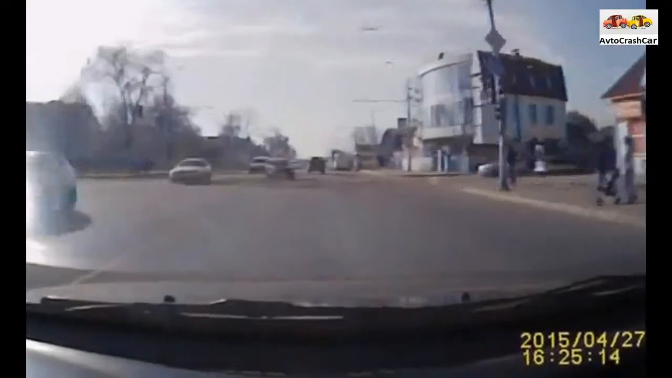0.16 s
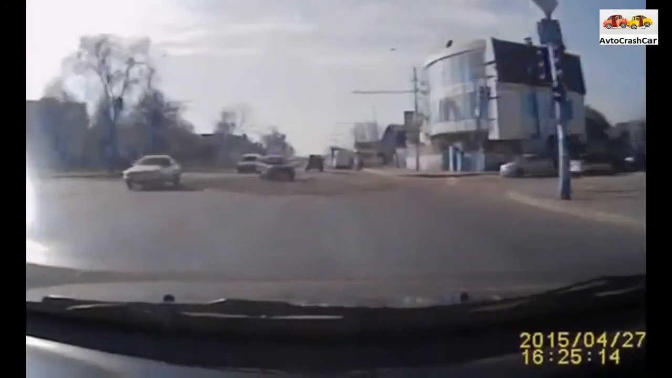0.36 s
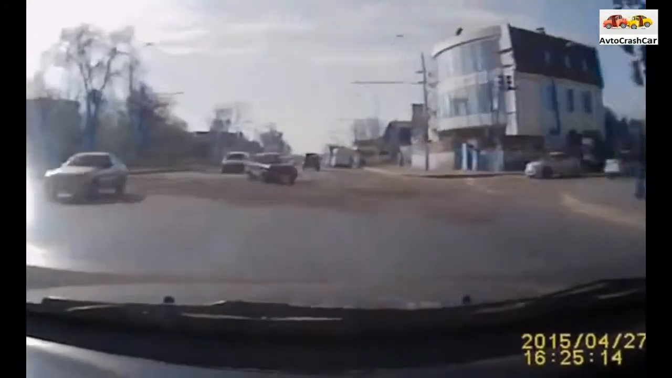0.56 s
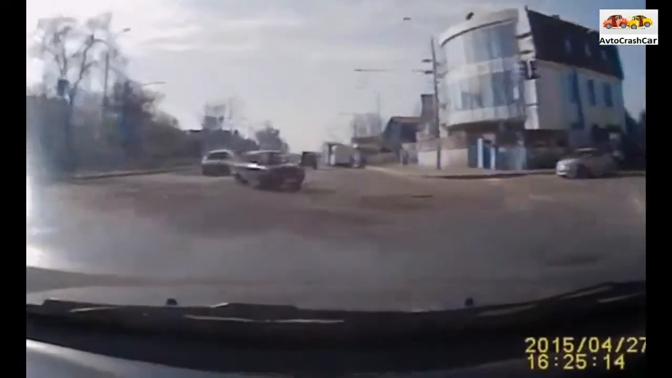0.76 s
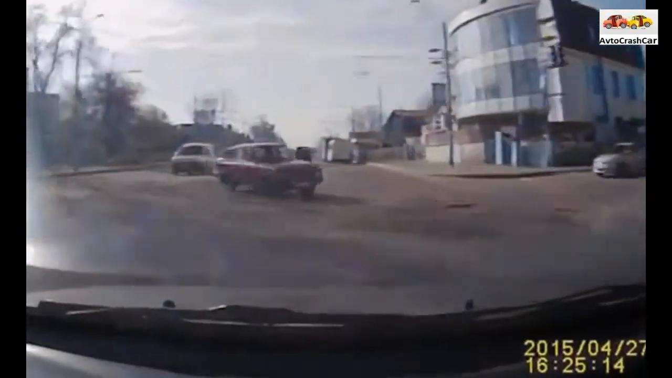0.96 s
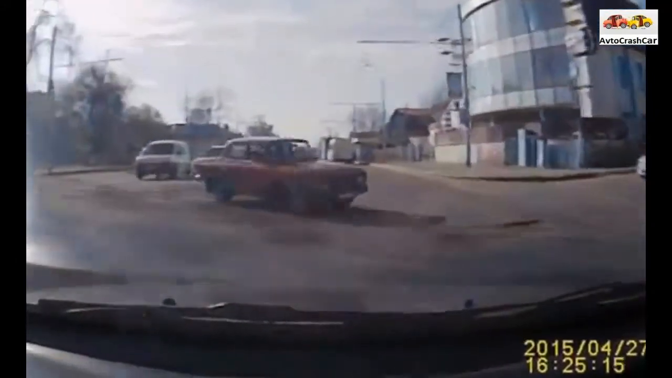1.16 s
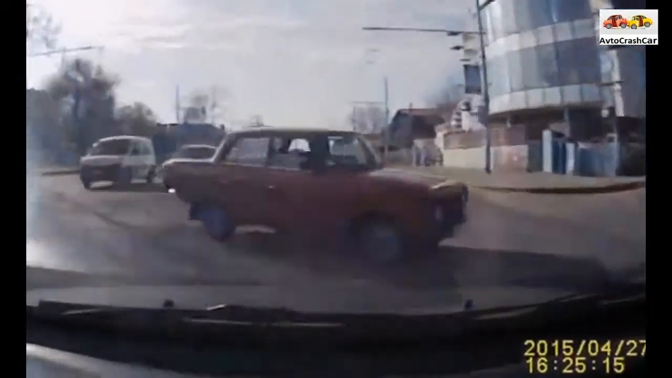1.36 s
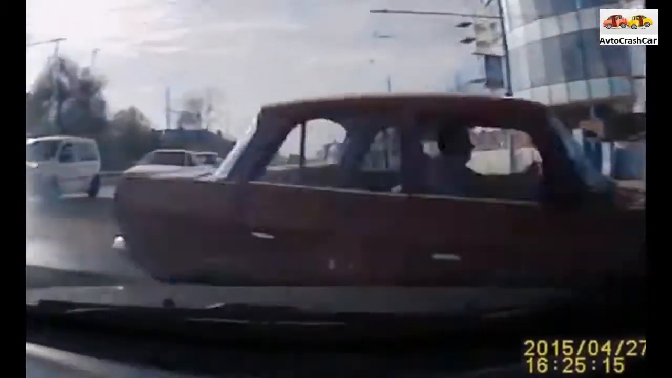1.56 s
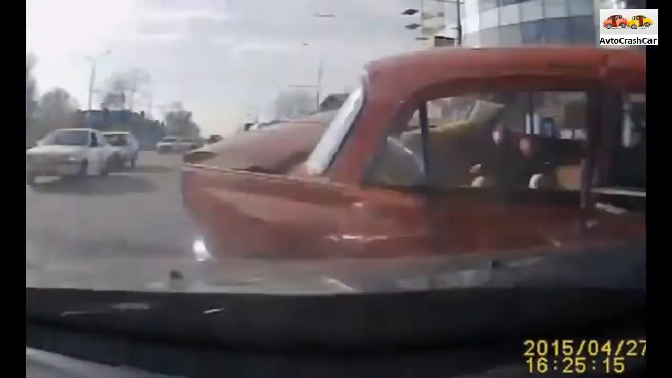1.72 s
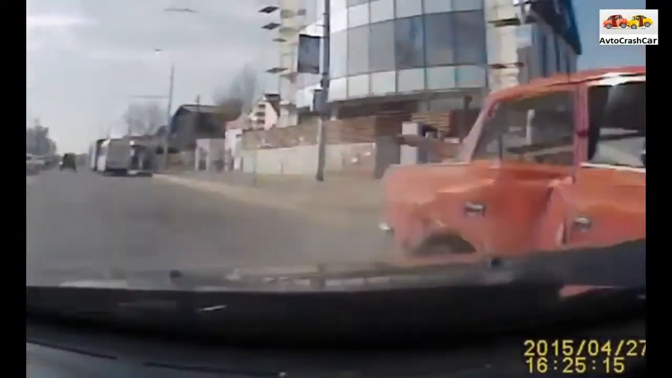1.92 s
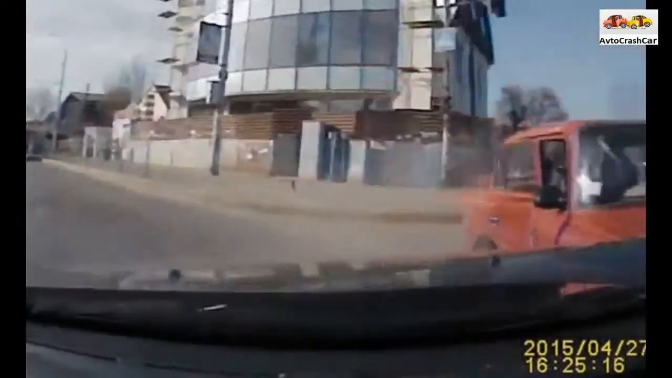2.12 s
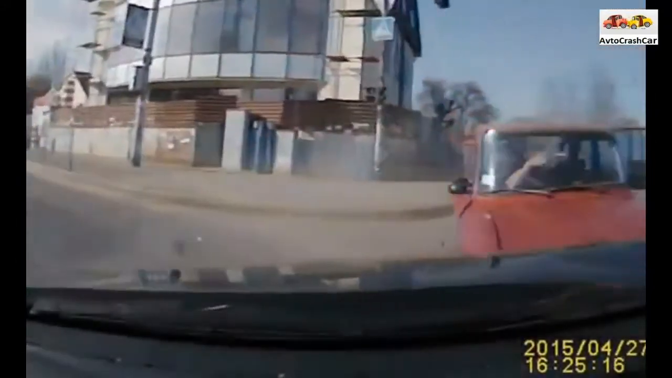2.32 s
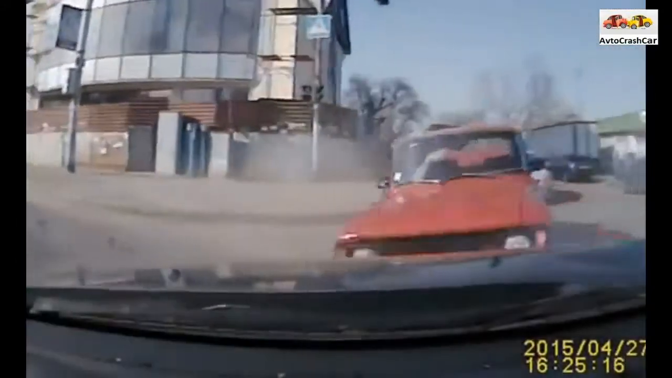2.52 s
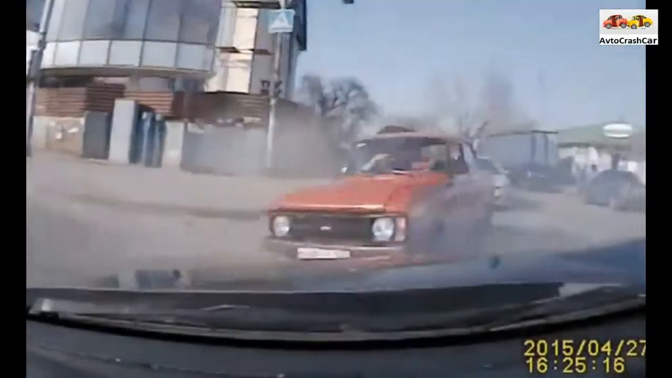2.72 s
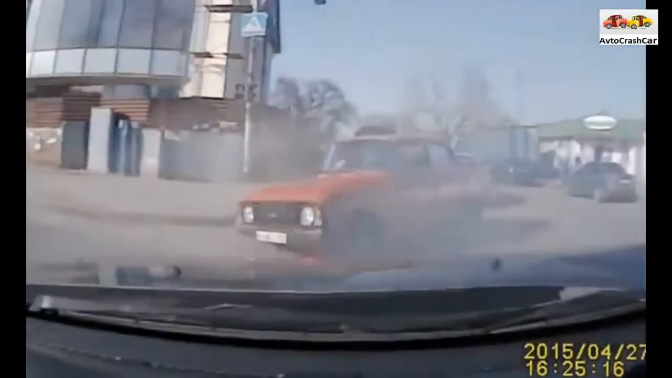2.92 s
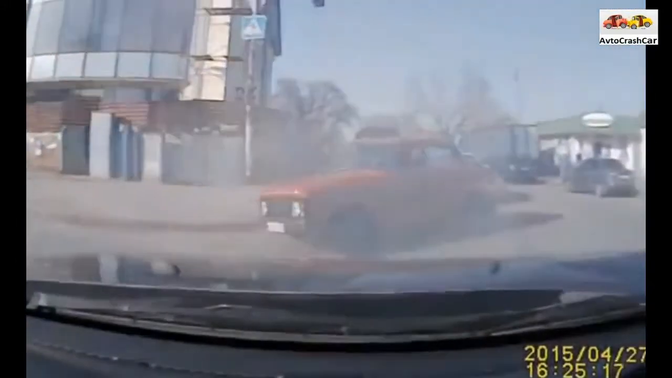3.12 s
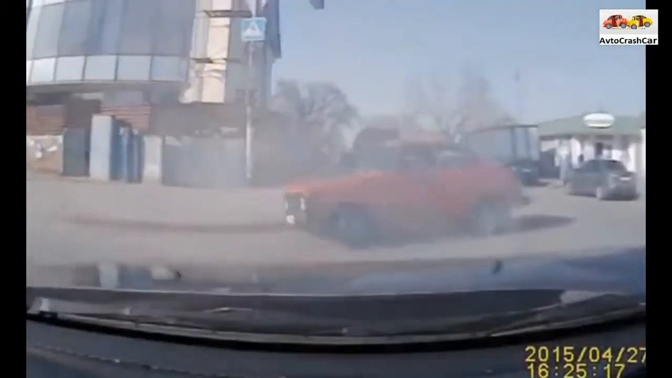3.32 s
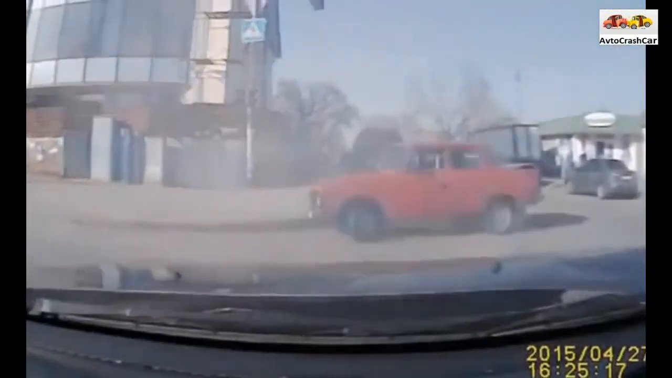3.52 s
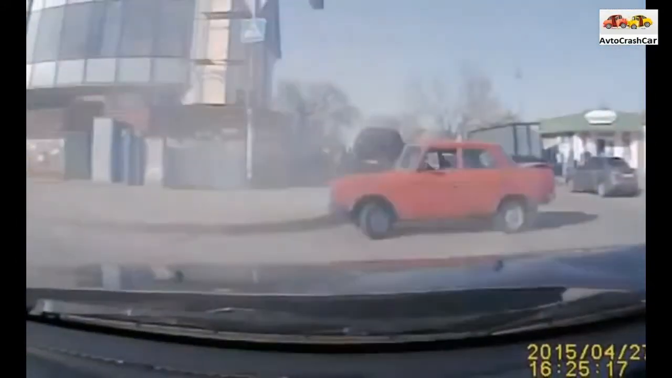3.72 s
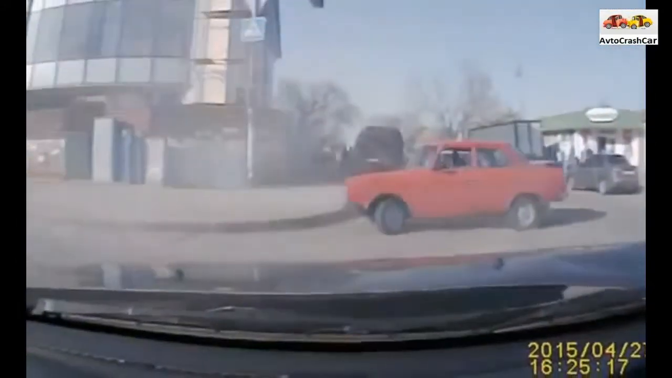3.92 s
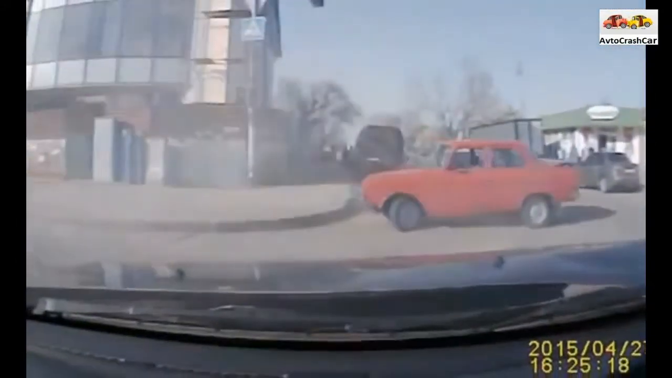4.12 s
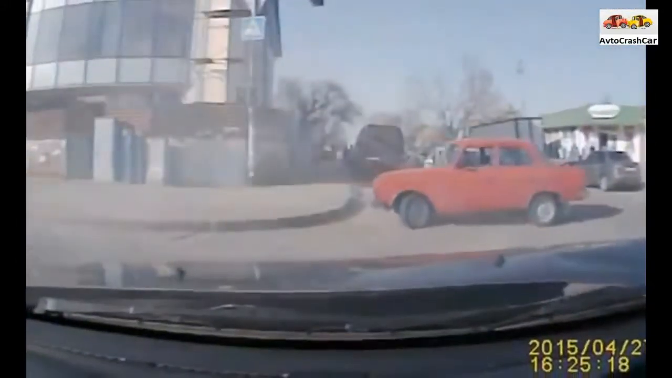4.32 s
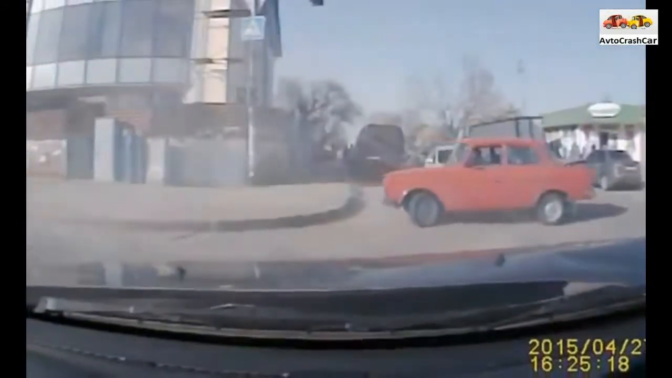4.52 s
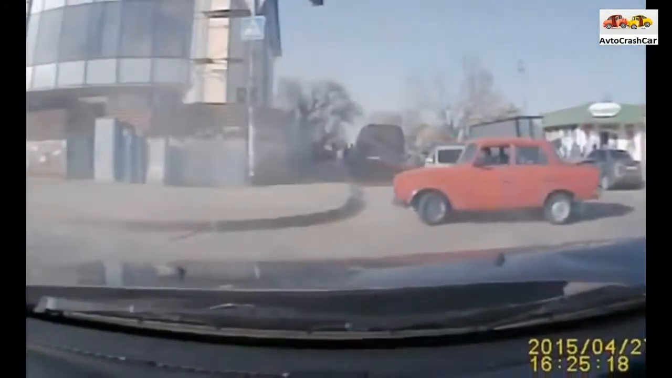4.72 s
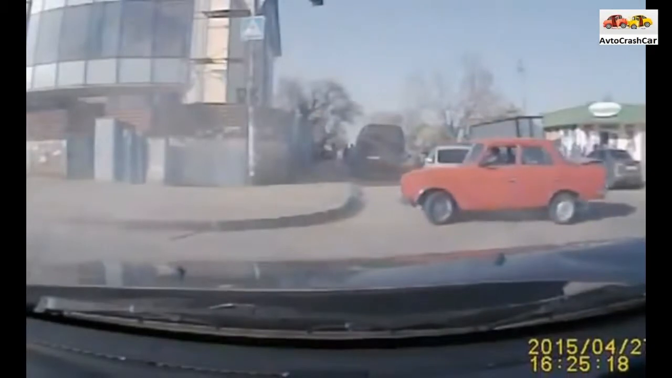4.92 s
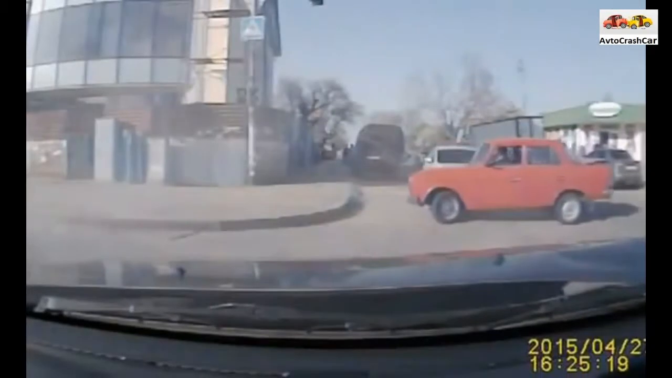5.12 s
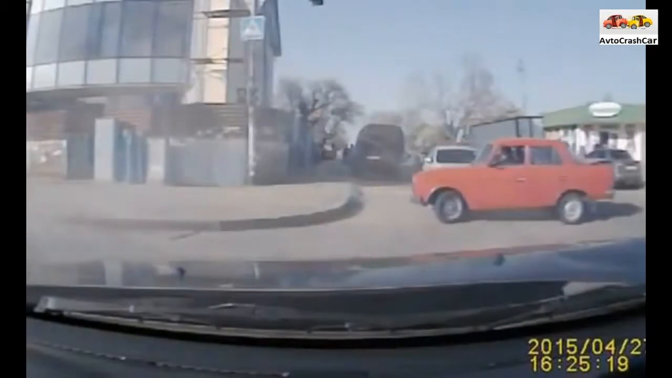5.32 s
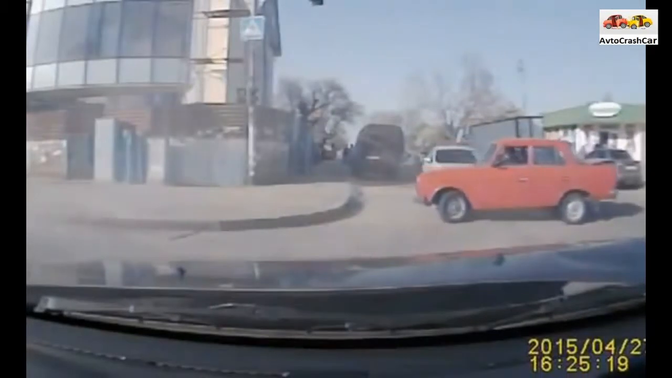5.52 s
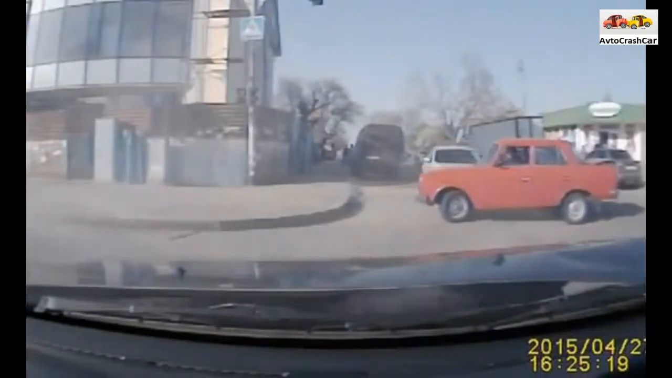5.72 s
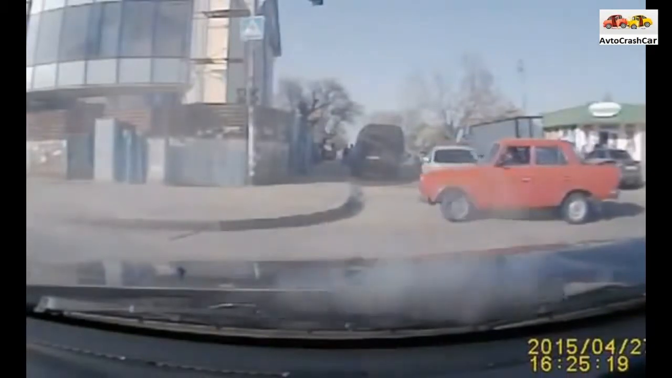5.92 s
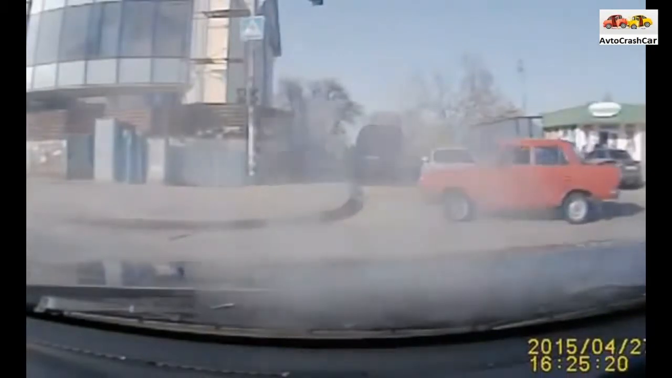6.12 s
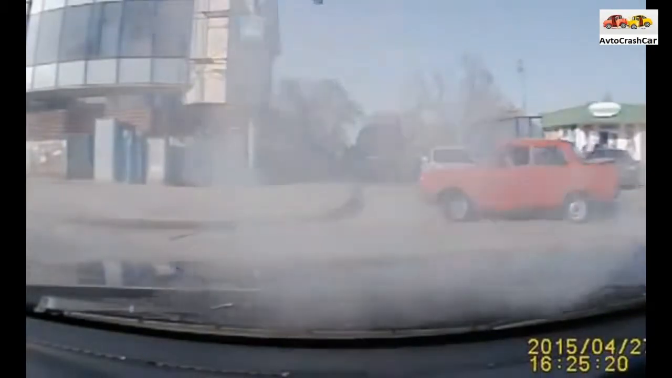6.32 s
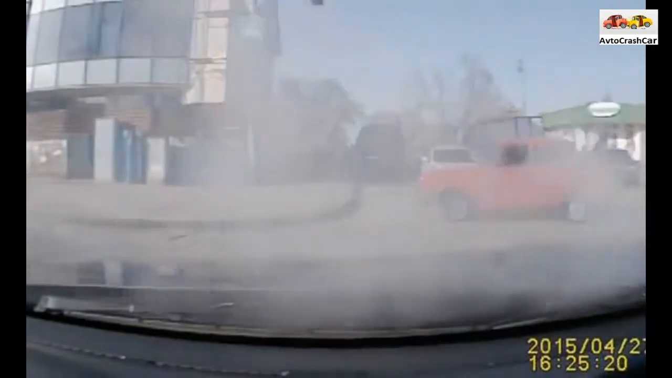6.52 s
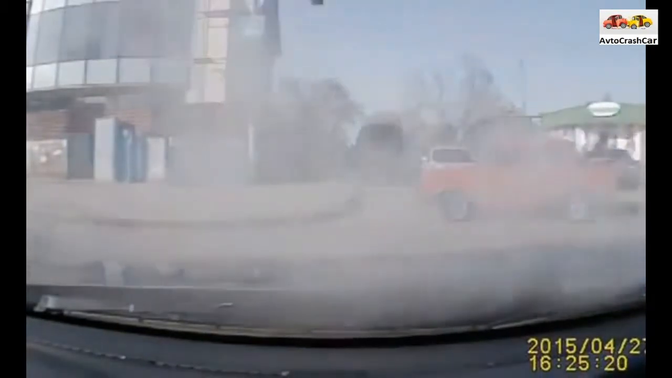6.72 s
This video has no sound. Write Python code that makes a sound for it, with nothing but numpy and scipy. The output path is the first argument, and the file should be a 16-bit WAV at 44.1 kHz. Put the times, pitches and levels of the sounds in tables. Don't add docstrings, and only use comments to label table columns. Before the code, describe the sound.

Heard from a cheap small microphone inside a moving car: rough road roar and trim knocks, then a loud two-tone horn and shrill tyre squeal under hard braking. A collision overloads the microphone in broken, crunching bursts. Metal bangs, tyres chirp, grit scrapes and shards clatter as the car slides to rest, leaving a faint idle, whistles, small knocks and one creak.

```python
import sys
import numpy as np
from scipy import signal
from scipy.fft import rfft, irfft
from scipy.io import wavfile
from scipy.ndimage import uniform_filter1d

SR = 44100
rng = np.random.default_rng(int(sys.argv[2]) if len(sys.argv) > 2 else 0)


def attenuation_scalar(level_db):
    decades = np.asarray(level_db, float) / 20
    return 10 ** decades


def transcribe(signal):
    frames = np.atleast_2d(signal).T
    limited = np.clip(frames, -1, 1)
    pcm = np.round(limited * 32767).astype(np.int16)
    wavfile.write(sys.argv[1], SR, pcm)


N = 302967

# time in seconds, pressure as a multiple of the recorder's limit.
PRESSURE = [
    (1.622, 0),
    (1.628, 30),
    (1.905, 30),
    (1.93, 2.5),
    (2.0, .8),
    (2.08, 0),
]
# start in seconds, length in seconds, rms as a share of the pressure.
CRUNCHES = [(1.623, .0105, 1.3), (1.6365, .002, 1.1), (1.6425, .0015, 1.6), (1.6465, .0014, 2.4),
            (1.7312, .0035, 1.3), (1.738, .0050, 1.0), (1.7450, .0060, 1.1), (1.7545, .0035, 1.6),
            (1.782, .0150, .95), (1.8185, .0105, 1.1), (1.830, .0065, .8), (1.845, .0450, 3.0),
            (1.8950, .004, .85), (1.906, .1700, 2.5)]
# time in seconds, squeal centre in Hz, level in dB.
SQUEALS = [
    [(.55, 1000, -42), (.68, 1013, -36), (.73, 1060, 0.5), (.82, 1182, -3), (.9, 1147, 0.5),
     (1.1, 1240, -3), (1.35, 1173, -5), (1.5, 1246, -5.5), (1.62, 1232, 0.5)],
    [(1.95, 1300, 2), (2.04, 1005, -17.5), (2.12, 1145, -10.5), (2.24, 1179, -3.5), (2.32, 1050, -17.5),
     (2.6, 1050, -21), (2.85, 1160, -12), (3.2, 1123, -19.5), (3.3, 1099, -23)],
]
# time in seconds, pitch jitter as a share, pitch spread between patches as a share.
TREAD_GRIP = [(.7, 0.02434, 0.054), (.85, 0.0262, .16), (1.62, 0.02416, .16), (2.0, 0.023, 0.071),
              (2.35, .027, .07), (2.7, 0.06, .13), (3.3, .07, .13)]
HORN_HZ = (404.0, 489.0)
# multiple of the pitch, level in dB.
HORN_OVERTONES = [
    [(1, -32), (2, -37.5), (3, -46), (4, -32), (5, -33.5), (6, -39), (7, -44), (8, -43)],
    [(1, -35), (2, -29), (3, -30.5), (4, -34), (5, -33.5), (6, -39.5), (7, -42)],
]
# time in seconds, level in dB.
HORN_LEVEL = [
    (.56, -23),
    (.6, 1.5),
    (.75, 11.5),
    (1.25, 8.5),
    (1.35, -3),
    (1.45, -48.5),
]
# time in seconds, peak in dB, crack in dB, time to fade 60 dB in seconds.
ROAD_KNOCKS = [(.218, -2, -34, .042), (.272, 4, -23, 0.048), (.277, 5.5, -23, 0.05), (.284, -6, -15, .042),
               (.298, -7, -26, 0.042), (.499, -1, -27, 0.056), (.58, 0.5, -11.5, 0.032),
               (.79, 6.5, -20, 0.13), (.87, 19.5, -12, 0.11), (.895, 4, 2, 0.079), (.939, -2, 7.5, 0.035),
               (1.097, 2, -21, .064), (1.317, 9.5, -29, 0.025), (1.399, 11.5, -10.5, 0.056)]
# time in seconds, peak in dB, crack in dB, time to fade 60 dB in seconds.
CRASH_KNOCKS = [(1.998, 24.5, -7.5, 0.074), (2.139, 20, -10, 0.04), (2.262, 19, -19.5, 0.073),
                (2.293, 8.5, -8, 0.07), (2.321, 14, -10.5, 0.039), (2.36, 24, -16, 0.06),
                (2.444, -2, -25, 0.042), (2.492, -8, -20, 0.032), (2.552, 13.5, -6.5, 0.07),
                (2.586, 8, -8, 0.063), (2.621, -3.5, -6.5, .074), (2.665, -4, -14, 0.082),
                (2.73, 12, -16, 0.033), (2.875, -8.5, -25, 0.2), (2.916, -17, -5, 0.064),
                (3.018, -11, -13, 0.072), (3.064, 0.5, -24, .04), (3.097, -6, -14, 0.04),
                (3.131, -1, -14, .05), (3.154, -2, -15, 0.023), (3.175, 4.5, -23, 0.089),
                (3.28, -12, -26, 0.034), (3.329, -3.5, -35, 0.29), (3.348, -5.5, -33, .15),
                (3.366, 12, -17.5, 0.053), (3.378, 0, -21, 0.079), (3.401, -8, -10.5, 0.083),
                (3.453, -11, -23, .053), (3.549, -1.5, -43, .07), (3.608, -8, -32, 0.028)]
# time in seconds, peak in dB, crack in dB, time to fade 60 dB in seconds.
REST_KNOCKS = [(3.717, -15, -14, 0.046), (3.837, -26, -23, 0.045), (3.957, -8, -26, 0.14),
               (4.031, -14, -19, 0.036), (4.459, -22, -25, .04), (4.861, -28, -19, .046),
               (5.563, -20, -17, 0.037), (5.6, -15, -25, .05), (5.609, -18, -12, 0.1),
               (6.057, -16, -14, .05), (6.065, -10.5, -17.5, .073), (6.08, -9.5, -15, 0.071),
               (6.111, -16, -10, 0.042), (6.13, -7, -10, 0.031), (6.142, -6.5, -15, 0.065),
               (6.145, -13, -20, .027), (6.425, -15, -38, .04), (6.549, -18, -19, 0.05),
               (6.621, -11.5, -19, 0.085), (6.766, -15, -21, 0.11)]
THUMP_DB = (-17.5, -29, -24)
# pitch in Hz, width in Hz, level in dB.
PANELS = [(150, 98, -10), (512, 192, 0), (824, 98, -2.5), (1050, 195, 2), (1300, 600, -3.5),
          (2017, 310, -7), (3250, 320, -20), (5750, 230, -20)]
# peak time in seconds, level in dB.
SHOWERS = [(2.2, -18.5), (2.45, -39), (2.92, -51), (2.55, -36), (2.75, -24.5), (3.15, -28), (3.4, -36)]
# start in seconds, pitch in Hz, level in dB, time to fade 60 dB in seconds.
TINKLES = [(2.411, 5575, -32, 0.08), (2.555, 5850, 9.5, 0.035), (2.665, 2090, -8, 0.039),
           (2.865, 5870, -16, 0.026), (3.157, 4188, -23, 0.062), (3.40, 3410, -19, 0.048),
           (5.98, 6730, -34, 0.13), (6.139, 3280, -18, 0.054), (6.141, 2090, -15, 0.043),
           (3.96, 3280, -26, 0.046)]
# time in seconds, pitch in Hz, level in dB.
CREAK = [(5.55, 1200, -50), (5.565, 1200, -26), (5.595, 1200, -27), (5.603, 1200, -16), (5.63, 830, -22),
         (5.645, 1050, -23), (5.665, 960, -21), (5.70, 1200, -23), (5.72, 1200, -50)]
# time in seconds, cabin roar in dB.
RIDE = [(0, -5.5), (.2, -9.5), (.6, -8), (.85, -3), (1.25, -4), (1.55, -4.5), (1.62, -6.5), (1.91, -18.5),
        (2.05, -4), (2.38, -5.5), (2.5, -10), (2.99, -16), (3.19, -14.5), (3.3, -16.5), (3.4, -14.5),
        (3.75, -20.5), (4.5, -22.5), (6.87, -24)]
# time in seconds, peak rumble in dB.
JOLTS = [(.28, -25), (.45, -31), (.89, -8), (1.11, -27), (1.4, -21), (1.56, -17), (1.9, -6), (2.0, -13),
         (2.3, -14), (2.36, -17), (2.56, -21.5), (2.73, -29), (2.9, -32.5), (3.37, -23.5), (4.1, -42),
         (4.45, -41), (5.2, -52), (6.15, -43)]
# frequency in Hz, level in dB per Hz.
ROAR_COLOUR = [(90, -44.5), (147, -11), (190, -13.5), (361, -8), (493, -8.5), (698, -6), (1030, -1.5),
               (1510, -8), (1890, -20.5), (2160, -19), (2740, -26.5), (4090, -37), (5600, -33),
               (6320, -32.5), (9000, -33)]
# frequency in Hz, level in dB per Hz.
RUMBLE_COLOUR = [(15, -7.5), (30, 4), (60, -2.5), (120, -2.5), (200, -8), (300, -36.5)]
# frequency in Hz, level in dB per Hz.
GRIT_COLOUR = [(1200, -12.5), (1900, -1.5), (2400, -1.5), (2700, -6), (3250, -7.5), (4000, -19.5),
               (4850, -11.5), (5450, -15.5), (6300, -17), (9000, -11.5)]
# time in seconds, level in dB.
IDLE = [
    (3.9, -59),
    (4.4, -43),
    (5.9, -48),
    (6.2, -62),
    (6.87, -46),
]
# pitch in Hz, width in Hz, level in dB.
WHISTLES = [(147.2, 8.9, -46.5), (498, 36, -39.5), (1039, 17, -38.5), (2090, 37, -53), (5510, 550, -50.5)]
# time in seconds, depth in dB.
GRAZES = [(1.693, -19), (1.714, -15), (1.715, -29), (1.716, -29), (1.7520, -9), (1.756, -12), (1.7611, -16),
          (1.7633, -16), (1.7648, -16), (1.7656, -22), (1.7659, -9)]
# frequency in Hz, gain in dB.
CONVERTER = [(0, -1), (4000, -0.5), (6000, -2.5), (7500, -6), (8000, -10), (8400, -26), (8700, -68.5)]

RAIL = 0.73
SHOWER_RISE_DB_PER_S, SHOWER_FALL_DB_PER_S = 95, 73
JOLT_RISE_DB_PER_S, JOLT_FALL_DB_PER_S = 307.5, 199
RUMBLE_DB, RUMBLE_FOLLOWS = -17.0, 1.51
GRIT_DB, GRIT_FOLLOWS = -5.5, 1.7
BRAKE_S, BITE_S, ROLLING_DB = 0.706, 0.17, -18.5
IDLE_HZ, WHINE_HZ, WHINE_DB = 33, 3130, -55
COUPLING_HZ, TOP_HZ = 1.9, 15350
KNEE, SQUEEZE = .65, .24
BUSY_NOISE_DB = -25


def collision():
    pressure = RAIL * in_time(PRESSURE)[0]
    share = np.zeros(N)
    for s, length, part in CRUNCHES:
        share[round(s * SR):round((s + length) * SR)] = part
    metal_colour = [(150, -4), (500, 2.5), (1100, 5), (2500, -9.0), (5500, -18), (9000, -10.5)]   # (Hz, dB)
    buckling = coloured(metal_colour, rng.standard_normal(N), patchy_db=1.0)
    return pressure * (1 + share * buckling)


def tyres():
    before, after = SQUEALS
    hz, db = in_time(list(before) + list(after))
    jitter, spread = in_time(TREAD_GRIP)
    patches = np.zeros(N)
    for place in np.linspace(-1, 1, num=6):
        patches += gliding(hz * (1 + spread * place), wander=.014, jitter=jitter, flutter_db=4.5)
    sample = np.arange(N)
    sliding = (sample > before[0][0] * SR) & (sample < after[-1][0] * SR)
    return attenuation_scalar(db) * rms_one(patches) * sliding


def horn():
    t = np.arange(N) / SR
    level_db = in_time(HORN_LEVEL)[0]
    tones = np.zeros(N)
    for hz, overtones in zip(HORN_HZ, HORN_OVERTONES):
        for k, db in overtones:
            tones += attenuation_scalar(db) * np.sin(2 * np.pi * k * hz * t + k * k)
    return np.sqrt(2) * attenuation_scalar(level_db) * tones * (level_db > -39)


def all_knocks():
    groups = (ROAD_KNOCKS, CRASH_KNOCKS, REST_KNOCKS)
    return [(*row, db) for rows, db in zip(groups, THUMP_DB) for row in rows]


def knocks():
    dull, bright, low = np.zeros(N), np.zeros(N), np.zeros(N)
    rattle = rng.choice([-1., 1.], (2, N))
    for s, db, bright_db, t60, thump_db in all_knocks():
        i = round(s * SR)
        age = np.arange(min(N - i, SR // 5)) / SR
        fade_s = max(t60, .01)
        dull[i:i + len(age)] += attenuation_scalar(db - 60 * age / fade_s) * rattle[0, i:i + len(age)]
        dull[i:i + 14] += attenuation_scalar(db + 2.5) * rattle[0, i] * np.hanning(14)
        bright[i:i + len(age)] += attenuation_scalar(db + bright_db - 100 * age / fade_s)
        low[i] += attenuation_scalar(db + thump_db) * rattle[0, i]
    body = np.zeros(N)
    for k, (hz, width_hz, db) in enumerate(PANELS):
        body += attenuation_scalar(db) * (-1) ** k * resonate(dull, hz, width_hz)
    crack_band = signal.butter(2, [1900, 8500], "band", fs=SR, output="sos")
    crack = signal.sosfilt(crack_band, bright * rattle[1])
    thump = resonate(resonate(low + 1e-18, 155, width_hz=73), 155, width_hz=82)
    return attenuation_scalar(5.5) * body + attenuation_scalar(2.0) * crack + attenuation_scalar(45.5) * thump


def debris():
    sizes = attenuation_scalar(3.8 * np.minimum(rng.exponential(1, N), 4)) * rng.choice([-1, 1], N)
    born = rng.random(N) < 1100 * attenuation_scalar(3.5 * drift(14.0)) / SR
    pitches = np.r_[np.geomspace(1900, 7200, num=12), 5300, 5450, 5600, 5800]
    dealt = rng.integers(0, 16, N)
    rings = np.zeros(N)
    for k, hz in enumerate(pitches):
        rings += resonate(sizes * born * (dealt == k) + 1e-18, hz, hz / 22.0)
    return swells(SHOWERS, SHOWER_RISE_DB_PER_S, SHOWER_FALL_DB_PER_S) * rms_one(rings)


def small_parts():
    t = np.arange(N) / SR
    tinkles = np.zeros(N)
    for s, hz, db, t60 in TINKLES:
        age = np.maximum(t - s, 0)
        tinkles += attenuation_scalar(db - 60 * age / t60) * np.sin(2 * np.pi * hz * age)
    hz, db = in_time(CREAK)
    creak = gliding(hz, wander=.004, jitter=.045, flutter_db=.4)
    rub = resonate(rng.standard_normal(N), 2400, width_hz=460)
    return tinkles + attenuation_scalar(db) * (creak + attenuation_scalar(-5.5) * rub) * (db > -49)


def ride():
    roar_db = in_time(RIDE)[0]
    roar = coloured(ROAR_COLOUR, rng.standard_normal(N), patchy_db=.45)

    jolts = swells(JOLTS, JOLT_RISE_DB_PER_S, JOLT_FALL_DB_PER_S)
    shaking = attenuation_scalar(RUMBLE_DB + RUMBLE_FOLLOWS * roar_db) + jolts
    rumble = coloured(RUMBLE_COLOUR, rng.standard_normal(N), patchy_db=-2.5)

    rolling = np.clip(1 - (np.arange(N) / SR - BRAKE_S) / BITE_S, 0, 1)
    grit_db = GRIT_DB + GRIT_FOLLOWS * roar_db + ROLLING_DB * rolling
    tick_sizes = attenuation_scalar(2.1 * np.minimum(rng.exponential(1, N), 5)) * rng.choice([-1, 1], N)
    ticks = (rng.random(N) < 900 / SR) * tick_sizes
    grit = coloured(GRIT_COLOUR, rms_one(ticks) + 2.0 * rng.standard_normal(N), patchy_db=3.5)
    return attenuation_scalar(roar_db - 2.38) * roar + shaking * rumble + attenuation_scalar(grit_db) * grit


def engine():
    t = np.arange(N) / SR
    out = np.sqrt(2) * attenuation_scalar(in_time(IDLE)[0]) * np.sin(2 * np.pi * IDLE_HZ * t)
    out += attenuation_scalar(WHINE_DB) * gliding(WHINE_HZ, wander=.002, jitter=.004, flutter_db=1.5)
    white = rng.standard_normal(N)
    for hz, width_hz, db in WHISTLES:
        whistle = resonate(resonate(white, hz, width_hz), hz, width_hz)
        out += attenuation_scalar(db) * rms_one(whistle)
    return out


def rms_one(x):
    return x / np.sqrt(np.mean(x ** 2) + 1e-20)


def in_time(rows):
    s, *columns = np.transpose(rows)
    return [np.interp(np.arange(N) / SR, s, c) for c in columns]


def swells(events, rise_db_per_s, fall_db_per_s):
    t = np.arange(N) / SR
    return sum(attenuation_scalar(db + np.minimum(rise_db_per_s * (t - s), fall_db_per_s * (s - t))) for s, db in events)


def drift(rate):
    r = np.exp(-40 * np.pi * rate / SR)
    white = rng.standard_normal(N // 20 + 4002)
    slow = signal.lfilter([1], [1, -2 * r, r * r], white)[4000:]
    return np.interp(np.arange(N) / 20, np.arange(len(slow)), rms_one(slow))


def resonate(x, hz, width_hz):
    r = np.exp(-np.pi * width_hz / SR)
    feedback = [1, -2 * r * np.cos(2 * np.pi * hz / SR), r * r]
    return signal.lfilter([(1 - r * r) / 2, 0, (r * r - 1) / 2], feedback, x)


def coloured(spectrum, white, patchy_db):
    hz, db = np.transpose(spectrum)
    grid = np.maximum(np.fft.rfftfreq(N, 1 / SR), 1)
    gain_db = np.interp(np.log(grid), np.log(hz), db, left=-80, right=-80)
    shaped = irfft(rfft(white) * attenuation_scalar(gain_db), N)
    return rms_one(shaped * attenuation_scalar(patchy_db * (drift(4.1) + drift(28.0))))


def gliding(hz, wander, jitter, flutter_db):
    pitch = hz * (1 + wander * drift(8.0) + jitter * drift(144.6))
    turns = np.cumsum(pitch) / SR
    return rms_one(np.sin(2 * np.pi * turns) * attenuation_scalar(flutter_db * drift(21.2)))


def scene():
    crash = collision() + tyres() + horn()
    wreckage = knocks() + debris() + small_parts()
    return (crash + wreckage + ride() + engine())[None]


def band_limit(x):
    return signal.sosfilt(signal.butter(12, 16340, fs=SR, output="sos"), x)


def record(dry):
    railed = np.clip(dry, -RAIL, RAIL)
    for s, db in GRAZES:
        railed[:, round(s * SR):round(s * SR) + 5] -= attenuation_scalar(db)
    capacitor = signal.butter(1, COUPLING_HZ, "high", fs=SR, output="sos")
    drained = signal.sosfilt(np.vstack([capacitor, capacitor]), railed)

    busy = np.sqrt(uniform_filter1d(np.diff(railed, prepend=0) ** 2, size=700) + 1e-12)
    grain = signal.lfilter([1], [1, -.8], rng.standard_normal(dry.shape))
    noisy = drained + attenuation_scalar(BUSY_NOISE_DB) * busy * grain

    hz, db = np.transpose(CONVERTER)
    gain_db = np.interp(np.fft.rfftfreq(N, 1 / SR), hz, db, right=-140)
    band = irfft(rfft(noisy) * attenuation_scalar(gain_db), N)

    tips = np.sign(band) * np.maximum(np.abs(band) - KNEE, 0)
    fizz = signal.sosfilt(signal.butter(2, 11000, "high", fs=SR, output="sos"), tips)
    bent = band - SQUEEZE * tips - attenuation_scalar(-0.5) * fizz
    bent = signal.sosfilt(signal.cheby2(18, 60, TOP_HZ, fs=SR, output="sos"), bent)
    mix = np.clip(attenuation_scalar(0.08) * bent, -1, 1)
    return band_limit(mix)


dry = scene()
out = record(dry)
transcribe(out)
```